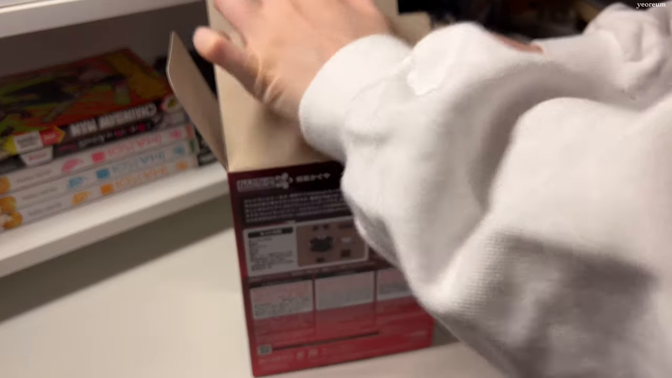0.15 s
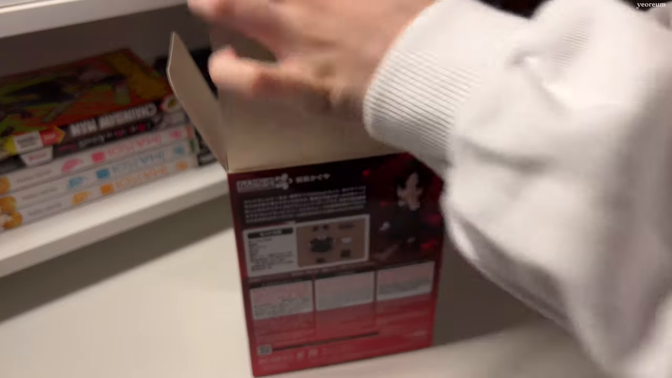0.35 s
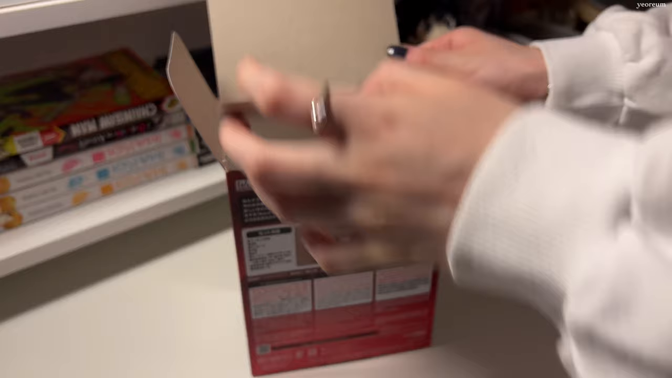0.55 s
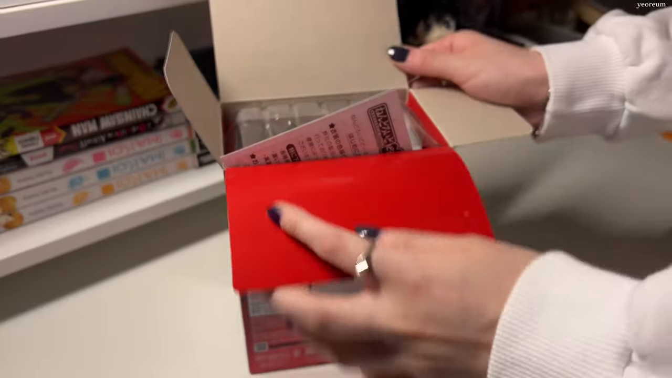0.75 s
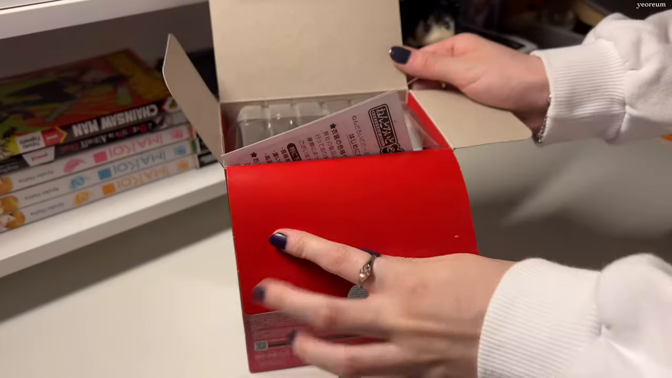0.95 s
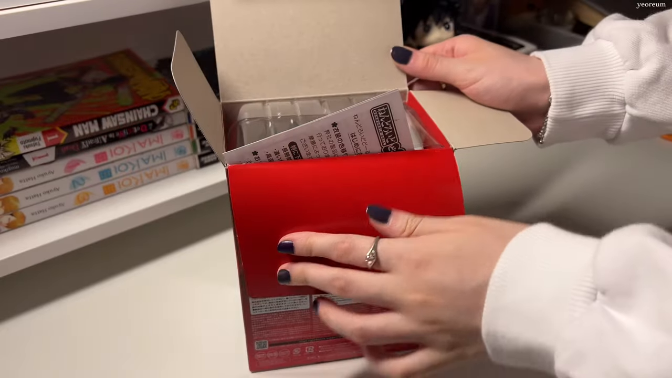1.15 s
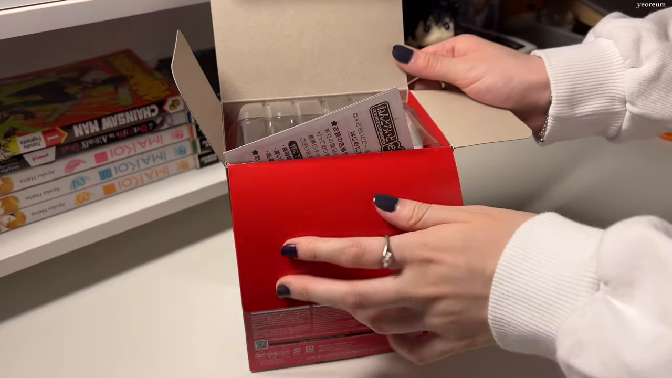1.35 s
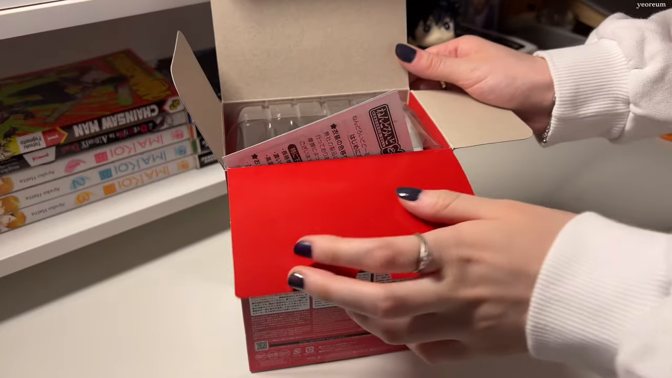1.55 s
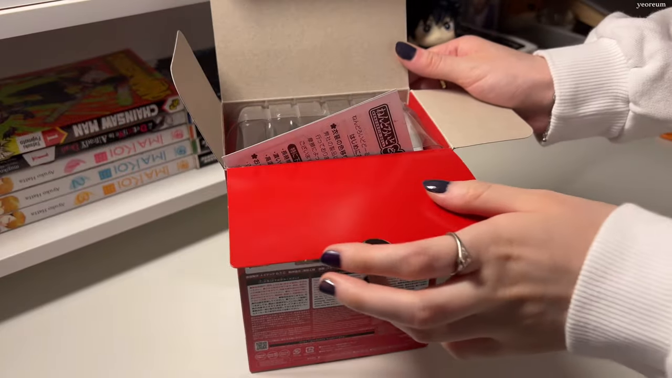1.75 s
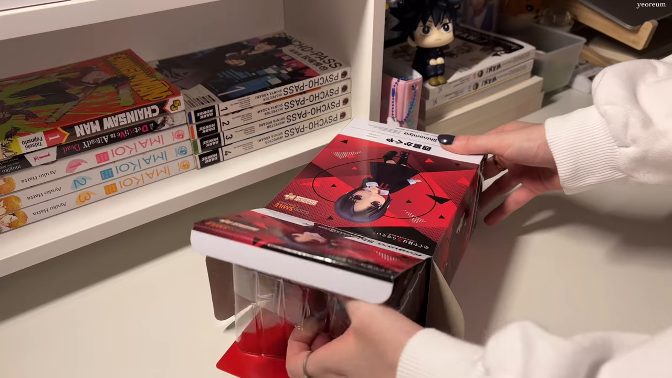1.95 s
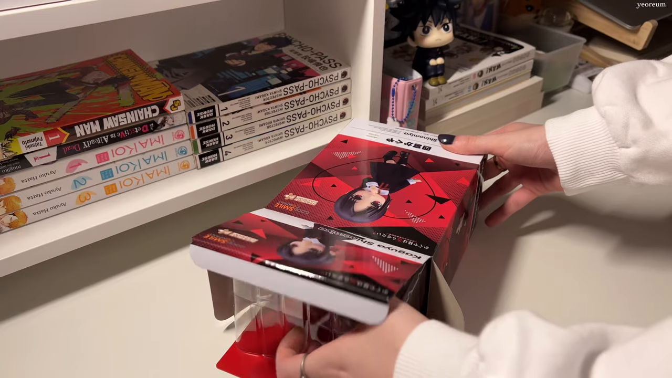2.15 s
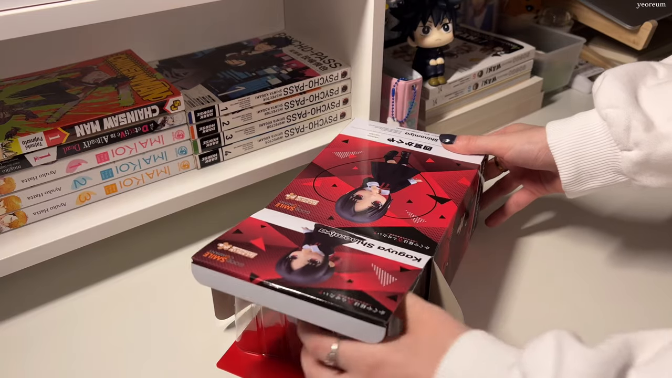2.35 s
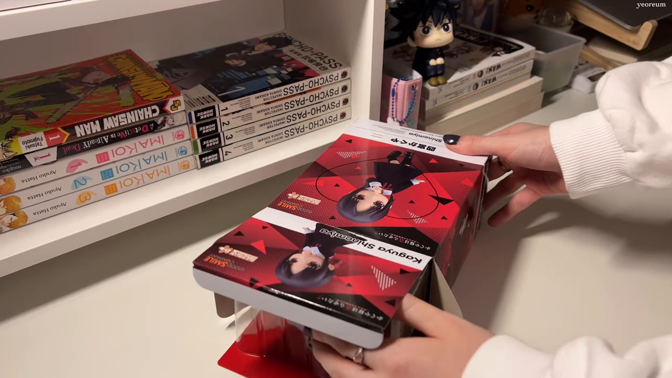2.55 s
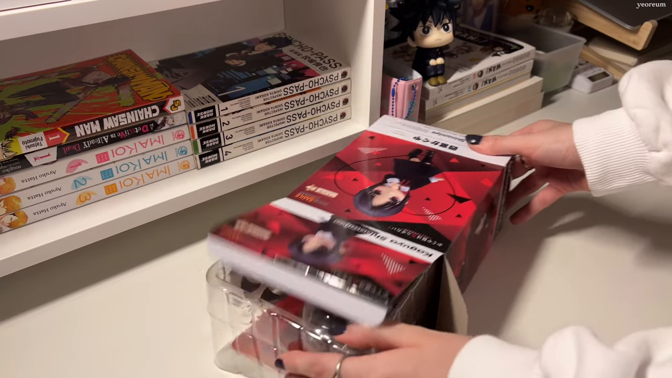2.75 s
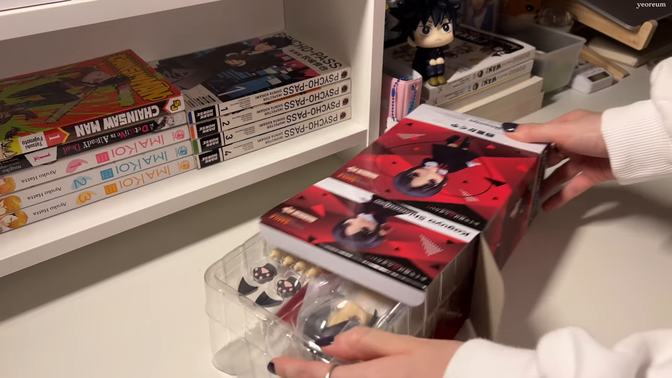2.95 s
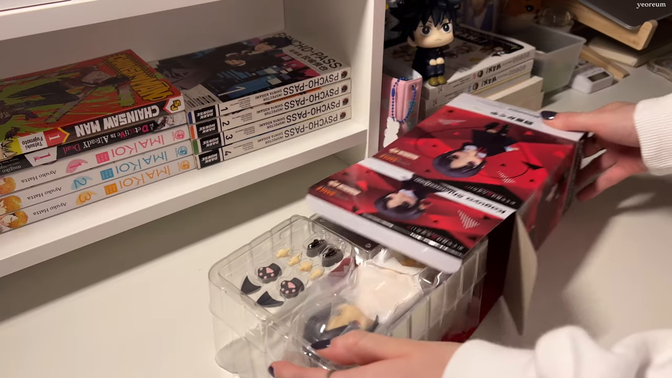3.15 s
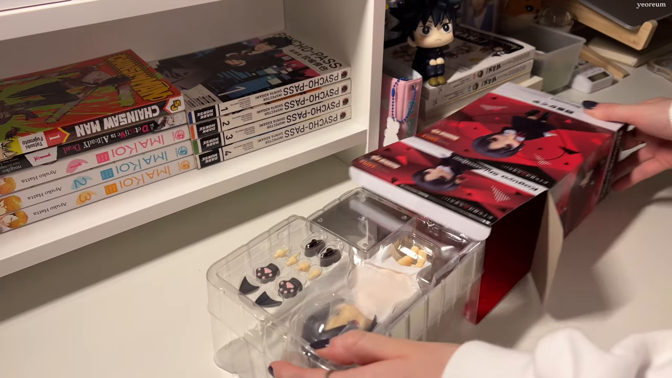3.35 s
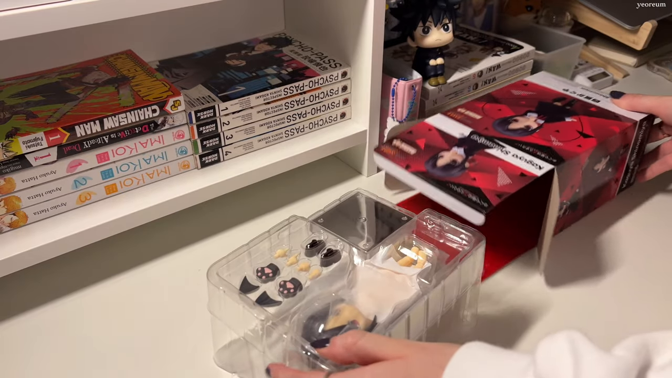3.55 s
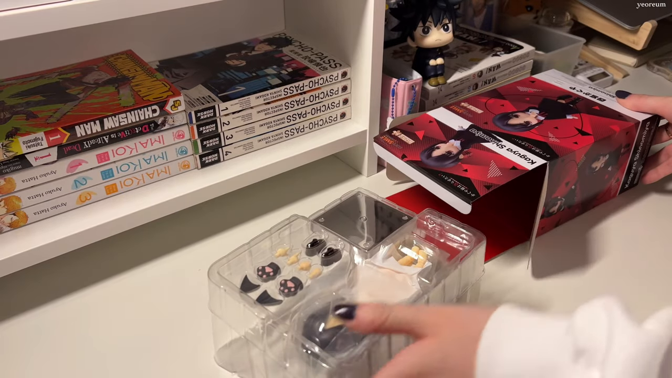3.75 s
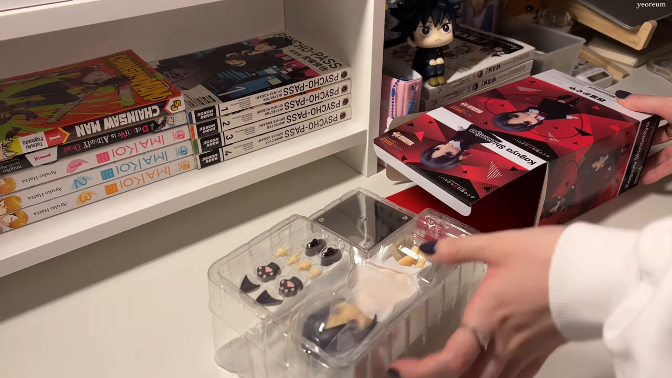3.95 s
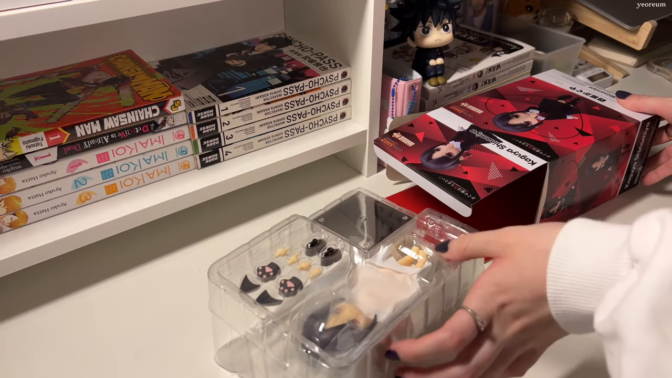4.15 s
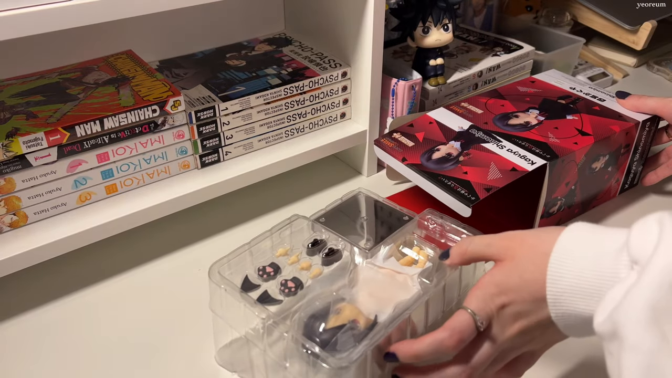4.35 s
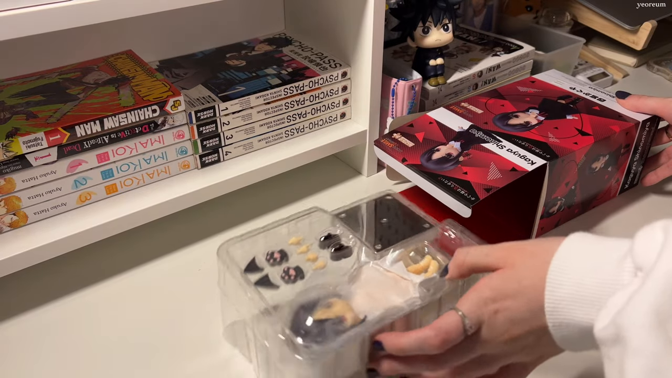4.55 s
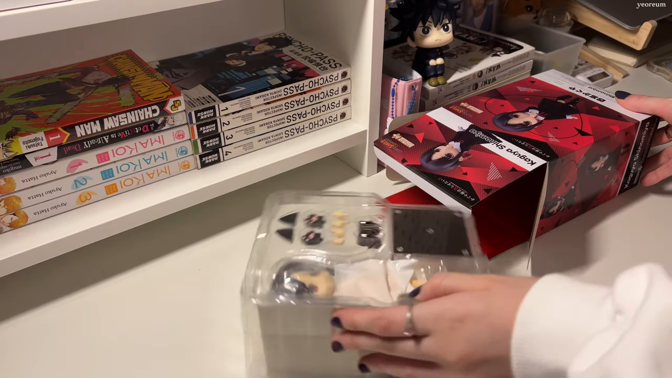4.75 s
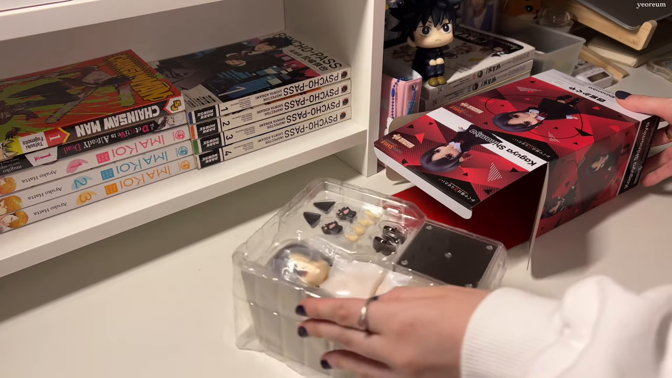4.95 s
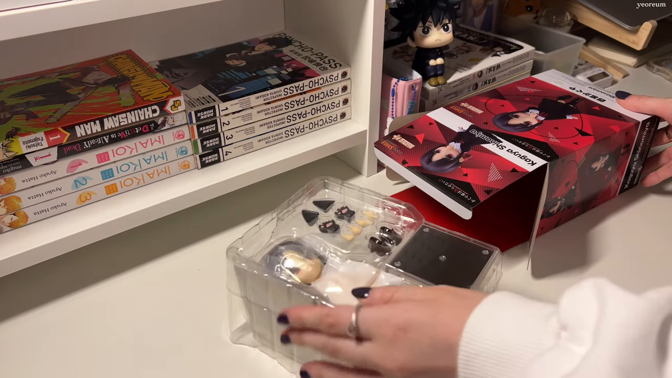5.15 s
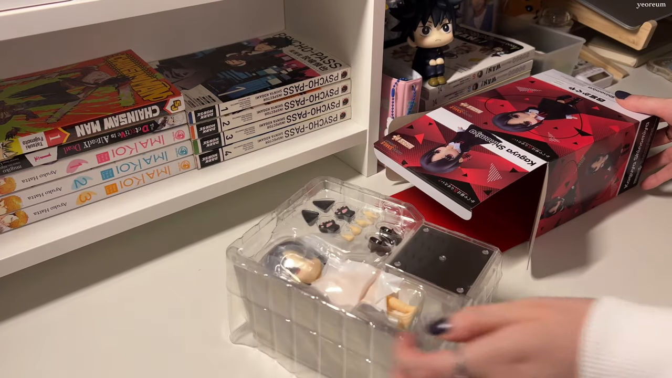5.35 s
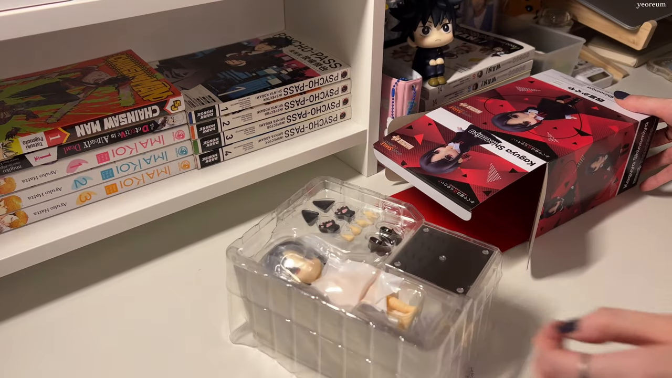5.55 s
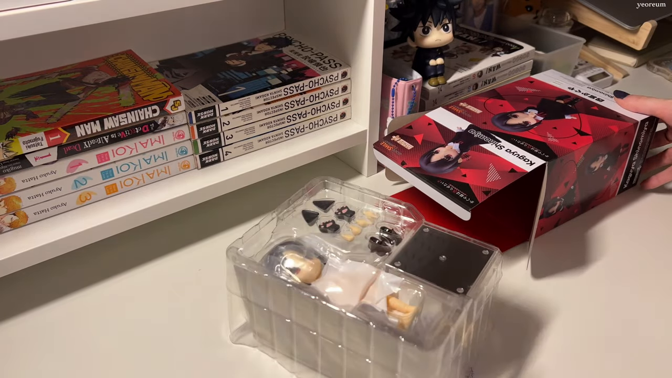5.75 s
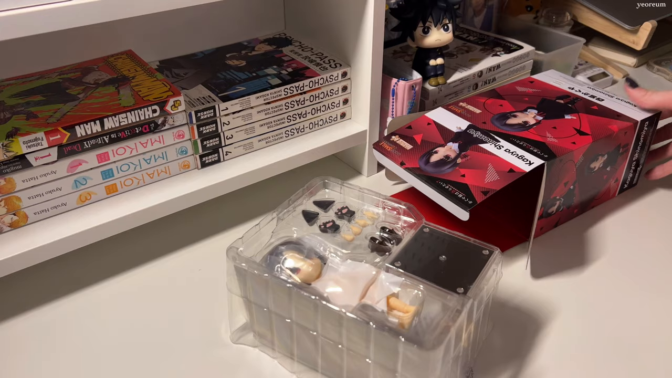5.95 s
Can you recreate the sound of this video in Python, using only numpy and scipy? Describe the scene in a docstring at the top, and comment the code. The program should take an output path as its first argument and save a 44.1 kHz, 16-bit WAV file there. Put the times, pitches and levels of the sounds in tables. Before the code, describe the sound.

Close stereo microphone in a small quiet room with a faint low hum. Fingers brush and tap a cardboard box, a flap scrapes free and lands with a dull knock. The box is tipped with sharper clacks, then a thin plastic tray is dragged out with a loud hollow scrape and crackle. Light taps follow, the tray is turned with a crinkly rub, and it goes quiet.

```python
"""A cardboard box ticks, knocks and scrapes as hands fold back its flaps and tip it over. A clear plastic tray
is pulled out of it and turned round on the desk, close by in a small quiet room with a low hum.
Blows ring damped modes and panel resonances; rubbing is stick-slip noise coloured by the panels. Pops are
falling notes, crackle is a shower of short rings, cloth is filtered noise; a short room tail follows."""
import sys
import numpy as np
from scipy import signal
from scipy.fft import rfft, irfft, next_fast_len
from scipy.io import wavfile
from scipy.ndimage import uniform_filter1d

SR = 44100
rng = np.random.default_rng(int(sys.argv[2]) if len(sys.argv) > 2 else 0)


def file_out(sig):
    """Save sig as 16-bit WAV at sys.argv[1]."""
    # one column per channel
    cols = np.atleast_2d(sig).T
    # limit, then scale
    lim = np.clip(cols, -1, 1)
    pcm = np.round(lim * 32767).astype(np.int16)
    wavfile.write(sys.argv[1], SR, pcm)


N = 264155
BLOW_SIZE, ATTACK_SIZE = 22050, 882  # samples: half a second and 20 ms
GRID_HZ = np.fft.rfftfreq(8192, 1 / SR)  # frequencies at which filters are drawn

# Resonances of the cardboard panels. Each row: frequency in Hz, width in Hz, lift in dB.
CARD_MODES = [(407, 50, 4), (565, 80, 4), (890, 110, 5), (1200, 130, 3), (1850, 380, 6), (3020, 430, 1)]
# Broad colour of a finger's rub, also used for cloth and dull dragging. Each row: frequency in Hz, level in dB.
FINGER_COLOUR = [(200, 8), (430, 6.5), (750, -6.5), (1400, -5.5), (2500, -13), (3500, -15), (5500, -30.5),
                 (8000, -32.5), (13000, -24.5), (16000, -30.5)]


def cardboard_box():
    """Impact and dry friction on card: fingers brush it, a flap scrapes free in a crescendo, the box is knocked."""
    # Blows. Each row: time in seconds, thud, clack and tick in dB, pitch of the struck spot in Hz, clack t60 in s.
    box_knocks = [(0.104, -49, -53, -67, 1660, 0.034), (0.161, -58, -53, -68, 1250, 0.049),
                  (0.181, -54, -55, -68, 510, 0.044), (0.481, -48, -51.5, -64, 490, 0.028),
                  (0.584, -62, -57, -66, 880, 0.052), (0.675, -55.5, -57, -54.5, 3430, 0.017),
                  (0.751, -65, -53, -53.5, 1970, 0.074), (0.837, -50.5, -50.5, -65, 790, 0.03),
                  (0.869, -59, -72, -83, 300, .03), (1.016, -25, -35.5, -44.5, 530, 0.02),
                  (1.033, -39, -37, -45, 910, 0.039), (1.089, -40, -41.5, -50, 1900, 0.028),
                  (1.117, -68, -51, -58, 2070, 0.041), (1.195, -48, -36, -46.5, 1880, 0.032),
                  (1.207, -41.5, -47.5, -65, 1920, 0.018), (1.218, -44, -67, -82, 300, .04),
                  (1.275, -70, -61.5, -90, 950, 0.034), (1.399, -81, -57, -74, 1350, 0.02),
                  (1.433, -56, -58, -68, 1320, 0.033), (1.462, -59, -64, -73, 1110, 0.024),
                  (1.488, -51.5, -58, -76, 1130, 0.038), (1.535, -69.5, -61.5, -74, 1130, 0.025),
                  (1.593, -54, -61, -81, 1140, 0.06), (1.839, -48, -56, -58, 1260, 0.06),
                  (1.876, -56.5, -57, -55, 1190, 0.046), (1.951, -64, -51.5, -57.5, 1190, 0.04),
                  (2.022, -50, -55, -72, 880, 0.039), (2.079, -54, -47, -61, 1920, 0.02),
                  (2.111, -41.5, -42.5, -49.5, 1240, 0.052), (2.143, -38, -29.5, -38, 1850, 0.034),
                  (2.186, -47, -42.5, -69, 1440, 0.057), (2.208, -54, -64, -84, 1800, 0.017),
                  (2.225, -68, -56.5, -76, 1480, 0.016), (2.253, -69.5, -50.5, -48, 1200, 0.012),
                  (2.326, -64, -46, -57, 1220, 0.083), (2.355, -61.5, -56, -66, 1540, 0.022),
                  (2.459, -50, -46, -56.5, 1270, 0.054), (2.484, -67, -47.5, -65.5, 428, .045),
                  (2.543, -56.5, -42.5, -61, 1220, 0.12), (2.713, -40, -32.5, -36.5, 1310, 0.03),
                  (2.718, -22.5, -24.5, -38.5, 630, 0.088), (2.741, -35.5, -35, -43, 2070, 0.03),
                  (2.831, -42, -25, -40.5, 1230, 0.03), (2.839, -38.5, -28.5, -62.5, 456, 0.085),
                  (2.888, -54, -29.5, -54, 630, 0.066), (2.921, -60, -44.5, -67, 1400, 0.013),
                  (3.08, -34, -27, -59, 685, 0.046)]
    # Strokes. Each row: start in seconds, length in seconds, scrape, hiss and drumming of the hollow body in dB.
    finger_rub = [(0.11, 0.29, -59.5, -66, -58), (0.48, 0.38, -53, -56, -65), (0.84, 0.38, -56.5, -69, -53),
                  (1.33, 0.15, -65, -64.5, -67), (1.84, 0.091, -56, -61, -49),
                  (1.96, 0.28, -55.5, -54.5, -67)]
    finger_scuffs = [(0.106, 0.018, -57, -65, -64), (0.14, 0.062, -55, -65, -68),
                     (0.212, 0.022, -48, -64, -49.5)]  # fingertips feel for the edge of the flap; columns as above
    flap_scrape = [(0.742, 0.031, -49, -50, -58), (0.772, 0.024, -50.5, -59, -60),
                   (0.794, 0.026, -40.5, -52.5, -65), (0.814, 0.0206, -36, -50.5, -54),
                   (0.834, 0.0082, -30.5, -60, -40)]  # the flap slips in jerks that grow harder; columns as above
    flap_smoothing = [(1.39, 0.39, -59.5, -59, -55.5)]  # fingers glide along the open flap; columns as above
    # Resonances of the flap. Each row: frequency in Hz, width in Hz, lift in dB.
    flap_modes = [(800, 120, 8), (1170, 100, 5), (1530, 220, 11), (1830, 220, 13.5), (2060, 90, 10),
                  (2240, 110, 12), (3330, 180, 6.5), (3600, 250, 5), (5300, 500, 6)]
    # Broad colour of the flap's scrape. Each row: frequency in Hz, level in dB.
    flap_colour = [(200, -9), (500, -10), (1200, -13.5), (2000, -12), (2800, -17), (5000, -24.5),
                   (8000, -23.5), (16000, -14.5)]

    knocks = blows(box_knocks, CARD_MODES, spot_db=11.5, spot_q=5, rise_s=0.0014,
                   tick_rise_s=0.0013, tick_t60=0.018)
    fingers = rub(strokes(finger_rub, attack_s=0.0073, swell_db_per_s=-22.5, release_t60=0.11, slow_db=-13.5),
                  FINGER_COLOUR, CARD_MODES, grain_db=4.5, grains_hz=685, judder_db=-2.5, judder_hz=93.9,
                  catch_per_s=49, catch_db=-15, bounce=0.43, bounce_s=0.00073)
    scuffs = rub(strokes(finger_scuffs, attack_s=0.012, swell_db_per_s=3, release_t60=0.038, slow_db=-1),
                 FINGER_COLOUR, CARD_MODES, grain_db=0.5, grains_hz=700, judder_db=2.0, judder_hz=164.4,
                 catch_per_s=110, catch_db=-10, bounce=0.24, bounce_s=0.00075)
    flap = rub(strokes(flap_scrape, attack_s=0.0029, swell_db_per_s=60, release_t60=0.018, slow_db=5),
               flap_colour, flap_modes, grain_db=-0.5, grains_hz=957, judder_db=0.5, judder_hz=264,
               catch_per_s=190, catch_db=-18, bounce=0.27, bounce_s=0.00054)
    glide = rub(strokes(flap_smoothing, attack_s=0.071, swell_db_per_s=-17.0, release_t60=0.18, slow_db=-3),
                FINGER_COLOUR, flap_modes, grain_db=0.0, grains_hz=820, judder_db=1.0, judder_hz=90.6,
                catch_per_s=17, catch_db=-14, bounce=0.16, bounce_s=0.00035)
    return panned(knocks, pan_db=0.8) + fingers + scuffs + glide + flap


def plastic_tray():
    """Stick-slip friction of a thin shell: the tray is gripped, tugged, drawn over the flap and turned round."""
    # Taps. Each row: time in seconds, thud, clack and tick in dB, pitch of the struck spot in Hz, clack t60 in s.
    tray_taps = [(3.379, -60, -53, -54, 1430, 0.012), (3.42, -42.5, -48, -56.5, 607, 0.034),
                 (3.554, -42.5, -36.5, -44.5, 1484, 0.078), (3.601, -57, -43, -70, 1310, 0.031),
                 (3.612, -64, -44.5, -59, 1420, 0.097), (3.657, -54, -47, -68, 1450, 0.052),
                 (4.075, -83.5, -43.5, -54, 1500, 0.032), (4.28, -63, -70, -96, 600, 0.062),
                 (4.386, -54.5, -46, -58.5, 1470, 0.022), (4.408, -48.5, -48.5, -62, 1430, 0.0072),
                 (4.453, -65, -68, -60, 1400, 0.063), (5.033, -54, -38.5, -61, 710, 0.062),
                 (5.069, -44.5, -46.5, -69, 720, 0.05), (5.1, -46, -56.5, -77, 680, 0.031),
                 (5.15, -61, -71, -93, 502, .08), (5.21, -59, -80, -93, 400, 0.053),
                 (5.713, -85, -67.5, -76.5, 1118, 0.042), (5.872, -65, -63, -90, 480, 0.03),
                 (5.918, -55, -56, -71.5, 1400, 0.049)]
    # Strokes. Each row: start in seconds, length in seconds, scrape, hiss and drumming of the hollow body in dB.
    tray_grip = [(2.1, 0.028, -43.5, -53, -49), (2.32, 0.43, -57, -64.5, -54.5),
                 (2.46, 0.27, -54, -56.5, -56)]
    tray_tug = [(2.54, 0.18, -32.5, -32, -40.5)]  # still tight in the box; columns as above
    tray_pull = [(2.68, 0.45, -31, -40, -34)]  # it rides out over the flap; columns as above
    tray_slide = [(2.95, 0.35, -34.5, -38.5, -44), (3.265, 0.14, -38.5, -41, -47),
                  (3.36, 0.28, -55, -51, -49.5)]  # it runs on along the desk, with one hitch; columns as above
    tray_turn = [(4.37, 0.6, -39.5, -37.5, -51.5)]  # columns as above
    tray_drag = [(4.35, 0.14, -48, -63, -57.5), (4.97, 0.11, -46, -64.5, -58)]  # slow and dull, as the turn starts and ends; columns as above
    # Tray resonances as it is held differently. Each row: frequency in Hz, width in Hz, lift in dB.
    tray_modes = [(240, 50, 4), (430, 30, 2.5), (545, 50, 7), (618, 75, 12.5), (715, 60, 10.5),
                  (850, 40, 2), (1170, 70, 5.5), (1410, 150, 8.5), (2850, 400, 3.5), (3830, 133, 2)]
    in_box_modes = [(445, 28, 4), (678, 80, 8), (926, 40, 4), (1230, 130, 5), (2180, 50, 4), (2610, 90, 6),
                    (2810, 100, 7), (4260, 190, 3), (5070, 90, 3)]  # columns as above
    on_flap_modes = [(180, 40, 6), (236, 30, 7), (345, 45, 7), (446, 30, 12), (614, 70, 11), (735, 60, 9),
                     (1200, 220, 6.5), (2034, 50, 7), (2810, 200, 4)]  # columns as above
    on_desk_modes = [(440, 30, 7), (560, 50, 6), (655, 100, 9), (1160, 55, 9), (1470, 80, 8),
                     (1750, 170, 3), (2440, 66, 5), (3100, 45, 2), (3790, 200, 9), (4340, 60, 5),
                     (5750, 140, 3)]  # running along the desk; columns as above
    # Broad colours of pulling and turning. Each row: frequency in Hz, level in dB.
    pull_colour = [(200, 2.5), (600, 3.5), (1000, 3), (2500, 0), (4000, -9), (7000, -20), (9000, -18),
                   (13000, -15.5), (16000, -21)]
    turn_colour = [(200, -5), (380, 6.5), (600, 7), (950, 5), (2500, 3.5), (4000, -7), (7000, -18),
                   (13000, -12), (16000, -17)]  # columns as above
    # The slide's emphasis rises, then sinks. Each row: time in seconds, centre frequency in Hz.
    slide_focus = [(2.98, 2500), (3.02, 2500), (3.06, 3850), (3.21, 3750), (3.28, 2300), (3.38, 1500)]
    # The part of the tray that speaks most shifts as it turns. Each row: time in seconds, centre frequency in Hz.
    turn_focus = [(4.38, 1410), (4.5, 1230), (4.57, 720), (4.63, 1350), (4.76, 1440), (4.82, 684),
                  (4.88, 1390), (4.96, 646), (5.04, 715)]

    taps = blows(tray_taps, tray_modes, spot_db=15.0, spot_q=4.3, rise_s=0.002,
                 tick_rise_s=0.0016, tick_t60=0.031)
    grip = rub(strokes(tray_grip, attack_s=0.021, swell_db_per_s=-0.5, release_t60=0.59, slow_db=-9.0),
               pull_colour, CARD_MODES, grain_db=1.5, grains_hz=560, judder_db=-3.0, judder_hz=106.6,
               catch_per_s=84, catch_db=0.5, bounce=0.12, bounce_s=0.0014)
    tugging = strokes(tray_tug, attack_s=0.091, swell_db_per_s=-8.0, release_t60=0.16, slow_db=1.0)
    tug = rub(tugging, pull_colour, in_box_modes, grain_db=0.0, grains_hz=1244, judder_db=-1.0,
              judder_hz=138.5, catch_per_s=38, catch_db=-13.0, bounce=0.21, bounce_s=0.00142)
    pulling = strokes(tray_pull, attack_s=0.064, swell_db_per_s=-24.5, release_t60=0.18, slow_db=-4.0)
    pull = rub(pulling, pull_colour, on_flap_modes, grain_db=1.5, grains_hz=881, judder_db=-0.5,
               judder_hz=129.8, catch_per_s=57, catch_db=-14, bounce=0.13, bounce_s=0.0016)
    sliding = strokes(tray_slide, attack_s=0.069, swell_db_per_s=-13, release_t60=0.19, slow_db=-3.0)
    slide = rub(sliding, pull_colour, on_desk_modes, grain_db=2.5, grains_hz=900, judder_db=1.7,
                judder_hz=150, catch_per_s=110, catch_db=-13, bounce=0.4, bounce_s=0.0015)
    slide = shifting(slide, slide_focus, lift_db=2.0, octaves=0.16)
    turning = strokes(tray_turn, attack_s=0.13, swell_db_per_s=1.0, release_t60=0.4, slow_db=-12.5)
    turn = rub(turning, turn_colour, tray_modes, grain_db=1.5, grains_hz=899, judder_db=0.66,
               judder_hz=151.6, catch_per_s=130, catch_db=-16, bounce=0.14, bounce_s=0.00124)
    turn = shifting(turn, turn_focus, lift_db=2.0, octaves=0.33)
    drag = rub(strokes(tray_drag, attack_s=0.019, swell_db_per_s=3, release_t60=0.13, slow_db=-12),
               FINGER_COLOUR, tray_modes, grain_db=1.0, grains_hz=960, judder_db=-3.5, judder_hz=118.7,
               catch_per_s=90, catch_db=-19, bounce=0.17, bounce_s=0.00121)
    snaps = crackle(tugging[0] + pulling[0] + sliding[0], on_desk_modes,
                    per_s=220, spread_db=4.5, t60=0.005, gain_db=-6.5)
    snaps += crackle(turning[0], tray_modes, per_s=300, spread_db=2.5, t60=0.009, gain_db=-10.5)
    return panned(taps, pan_db=1.5) + grip + tug + pull + slide + turn + drag + snaps


def blows(rows, panel, spot_db, spot_q, rise_s, tick_rise_s, tick_t60):
    """Impact excitation: a contact tick, a brief chatter in the panels and a modal thud of the hollow body."""
    # Modes of the hollow box on the desk. Each row: nominal frequency in Hz, level in dB, t60 in seconds.
    thud_modes = [(75, -13.5, 0.67), (106.4, -2.5, 0.31), (137.3, 4.5, 0.049), (166.8, 9, 0.04),
                  (215.2, -0.5, 0.11), (261.3, -2.5, 0.12), (340, -2.5, 0.14), (436.3, -3, 0.098),
                  (570, -1, 0.05)]
    # Broad colour of the panel chatter. Each row: frequency in Hz, level in dB.
    clack_colour = [(100, -17.5), (210, 0.5), (300, 3), (600, 1), (1500, -4), (3000, -4), (5000, -19),
                    (9000, -41), (16000, -55.5)]
    # Colour of the contact tick. Each row: frequency in Hz, level in dB.
    tick_colour = [(1000, -27), (3000, 3.5), (4500, -1.5), (8000, -6), (13000, -1), (16000, -6),
                   (20000, -20.5)]
    out, t = np.zeros((2, N)), np.arange(BLOW_SIZE) / SR
    contact_db = body(tick_colour)
    # card and thin plastic give way, so the contact builds up over a millisecond or two
    rise, tick_rise = 1 - np.exp(-(t / rise_s) ** 2), 1 - np.exp(-(t / tick_rise_s) ** 2)
    for s, thud_db, clack_db, tick_db, spot_hz, t60 in rows:
        detune = 1 + 0.027 * rng.standard_normal(len(thud_modes))
        ring = np.zeros(BLOW_SIZE)
        for k, (hz, db, life) in enumerate(thud_modes):
            ring += (-1) ** k * amp(db) * decay(t, life) * np.sin(2 * np.pi * hz * detune[k] * t)
        # the loose contents shift, so the thud dies away unevenly
        shifts, uneven_db, shifts_per_s = rng.standard_normal(64), 2.5, 55
        ring = ring * amp(uneven_db * np.interp(t * shifts_per_s, np.arange(len(shifts)), shifts))

        spot = [(spot_hz, spot_hz / spot_q, spot_db)]
        panel_db = np.maximum(body(clack_colour, panel), body(clack_colour, spot))
        # a soft contact that sounds low also excites the higher panel modes less
        reach, dull_db = 1.8, -5
        panel_db = panel_db + dull_db * np.tanh(2 * np.log(np.maximum(GRID_HZ / (reach * spot_hz), 1)))
        chatter = filtered(noise_pair(BLOW_SIZE) * rise * decay(t, max(t60, 0.005)), panel_db)
        contact = filtered(noise_pair(BLOW_SIZE) * tick_rise * decay(t, tick_t60), contact_db)
        clack, tick = amp(clack_db) * struck(chatter), amp(tick_db) * struck(contact)
        thud = amp(thud_db) * struck(np.array([ring, ring]) * rise)
        add(out, s - rise_s, thud + clack + tick)
        # the surfaces graze each other just before they meet
        graze_db, graze_s = -15, 0.004
        add(out, s - rise_s - graze_s, amp(graze_db) * (tick + clack))
    return out


def strokes(rows, attack_s, swell_db_per_s, release_t60, slow_db):
    """Friction follows pressure, which builds, drifts and lets go; slow_db weights the hiss where speed is low."""
    drum_power = 0.67  # the hollow body follows the pressure less steeply than the scrape does
    hiss_lag, hiss_stop = 3.2, 0.25  # exponents that make the hiss rise later and change how it is released
    power = np.zeros((3, N))
    for start, length, scrape_db, hiss_db, drum_db in rows:
        age = np.arange(N) / SR - start
        moving, after = np.clip(age, 0, length), np.maximum(age - length, 0)
        rise = np.clip(age / attack_s, 0, 1)
        speed = np.sin(np.pi * moving / length)
        release = decay(after, release_t60)
        pressure = rise ** 1.3 * amp(swell_db_per_s * moving) * release
        scrape = amp(scrape_db) * pressure
        hiss = amp(hiss_db + slow_db * (1 - speed)) * pressure * rise ** hiss_lag * release ** hiss_stop
        drum = amp(drum_db) * pressure ** drum_power
        power += np.array([scrape, hiss, drum]) ** 2
    return np.sqrt(power)


def rub(levels, colour, resonances, grain_db, grains_hz, judder_db, judder_hz,
        catch_per_s, catch_db, bounce, bounce_s):
    """Stick and slip: fine grains, clumped by a slower judder, excite the panels and the hollow body."""
    # Colour of the hollow body's drumming. Each row: frequency in Hz, level in dB.
    drum_colour = [(20, -26), (35, -15.5), (50, -12), (72, -2.5), (90, -5.5), (106, 3.5), (135, -2),
                   (185, -1.5), (280, -5), (500, -22.5), (1500, -84.5)]
    t = np.arange(N) / SR
    scrape, hiss, drum = levels
    force = amp(judder_db * wander(judder_hz)) * catches(catch_per_s, catch_db, 0.002)
    slips = noise_pair(N) * amp(grain_db * wander(grains_hz)) * force
    # as the pressure shifts, different patches of the panel speak
    spectrum = signal.stft(slips, nperseg=512)[2]
    patches = uniform_filter1d(rng.standard_normal(spectrum.shape[1:]), size=3, axis=0)
    patches = evened(uniform_filter1d(patches, size=14, axis=1))
    patchy_db = 2.0
    slips = signal.istft(spectrum * amp(patchy_db * patches), nperseg=512)[1][:, :N]
    # the contact moves, so its bounce off the nearest panel sweeps the colour
    delay_s = bounce_s * amp(2.67 * wander(5))
    bounced = np.array([np.interp(t - delay_s, t, channel) for channel in slips])
    swept = slips + bounce * bounced
    # the scrape keeps the middle band, the hiss the treble
    response_db = body(colour, resonances)
    treble = (GRID_HZ / 4600) ** 6 + 1e-9
    bass = (260 / (GRID_HZ + 20)) ** 4
    scrape_db = response_db - 10 * np.log10((1 + treble) * (1 + bass))
    hiss_db = response_db - 10 * np.log10(1 + 1 / treble)
    out = scrape * evened(filtered(swept, scrape_db))
    # fast sliding breaks the contact into finer, brighter grains
    fine = noise_pair(N) * amp(grain_db * wander(grains_hz)) * np.sqrt(force)
    out += hiss * evened(filtered(fine, hiss_db))
    return out + drum * evened(filtered(slips, body(drum_colour)))


def catches(per_s, size_db, length_s):
    """Stored strain released at random: an edge catches and lets go in brief bursts of force, a few large."""
    chance, size = rng.random(N), np.minimum(rng.exponential(1, N), 3)
    kicks = (chance < per_s / SR) * size * amp(size_db)
    return 1 + signal.lfilter([1], [1, -np.exp(-1 / (length_s * SR))], kicks)


def shifting(x, focus, lift_db, octaves):
    """Time-varying resonance: a broad peak moves along the curve focus."""
    hz, t, spectrum = signal.stft(x, SR, nperseg=512)
    away = np.log2((hz[:, None] + 1) / np.interp(t, *np.transpose(focus))) / octaves
    return signal.istft(spectrum * amp(lift_db * np.exp(-away ** 2)), SR, nperseg=512)[1][:, :N]


def crackle(level, resonances, per_s, spread_db, t60, gain_db):
    """Snap release: ridges of thin plastic snag and spring free, each ringing near one resonance for a moment."""
    t = np.arange(4 * ATTACK_SIZE) / SR
    snaps = (rng.random(N) < per_s / SR) * amp(spread_db * np.minimum(rng.exponential(1, N), 3))
    which, out = rng.integers(0, len(resonances), N), np.zeros((2, N))
    for at in np.flatnonzero(snaps * (level > level.max() / 100)):
        hz = resonances[which[at]][0] * np.exp(0.1 * rng.standard_normal())
        snap = snaps[at] * np.sin(2 * np.pi * hz * t) * decay(t, t60)
        add(out, at / SR, panned(snap, 3 * rng.standard_normal()))
    return amp(gain_db) * level * out


def pops():
    """Buckling: a flexed panel pops with a ragged note that falls as it relaxes, broken up by rattling."""
    # Each row: time in seconds, level in dB, nominal first and last frequency in Hz, t60 in seconds.
    panel_pops = [(0.4805, -46.5, 1650, 420, .035), (2.8305, -26, 1500, 330, .05),
                  (3.083, -28, 700, 500, .06), (5.036, -59, 2900, 2850, .03),
                  (5.1, -56.5, 2870, 2780, .025)]
    out, t = np.zeros((2, N)), np.arange(BLOW_SIZE) / SR
    relax_s, rise_s, ragged, rattle_db, rattle_hz = 0.007, 0.0006, 0.35, 4, 800
    for s, db, first_hz, last_hz, t60 in panel_pops:
        buckle, rattle = wander(rattle_hz)[:BLOW_SIZE], wander(rattle_hz)[:BLOW_SIZE]
        hz = last_hz + (first_hz - last_hz) * np.exp(-t / relax_s) * (1 + ragged * buckle)
        note = np.sin(2 * np.pi * np.cumsum(hz) / SR) * (1 - np.exp(-t / rise_s)) * decay(t, t60)
        note = note * amp(rattle_db * np.tanh(rattle))  # the panel rattles against its neighbours
        add(out, s, amp(db) * struck(np.array([note, note])))
    return out


def sleeve():
    """Cloth friction: broadband grains swish, swelling and fading as the arm draws back."""
    # Each row: start in seconds, length in seconds, scrape, hiss and drumming of the hollow body in dB.
    sleeve_brush = [(0.27, 0.26, -55, -52.5, -60.5), (5.59, 0.218, -70.5, -73.5, -79)]
    return rub(strokes(sleeve_brush, attack_s=0.031, swell_db_per_s=-11, release_t60=0.048, slow_db=-9.5),
               FINGER_COLOUR, [(1430, 500, 7.2)], grain_db=2.5, grains_hz=650, judder_db=-4.5,
               judder_hz=59.6, catch_per_s=51, catch_db=-10, bounce=0.3, bounce_s=0.00084)


def cuff_zip():
    """Periodic ribs flick past an edge: a fluttering narrow noise band whose pitch follows the slowing speed."""
    # A ribbed cuff on the edge of the card. Each row: time in seconds, centre frequency in Hz, level in dB.
    zip_curve = [(0.31, 6600, -85), (0.335, 6300, -64), (0.36, 6200, -70), (0.395, 5750, -62),
                 (0.425, 5550, -62.5), (0.455, 5400, -71), (0.48, 5300, -90)]
    when, hz, db = np.transpose(zip_curve)
    t, width_hz = np.arange(N) / SR, 420
    lowpass = signal.butter(2, width_hz / 2, fs=SR, output="sos")
    fuzz = signal.sosfilt(lowpass, rng.standard_normal((2, 2, N)))
    carrier = np.exp(2j * np.pi * np.cumsum(np.interp(t, when, hz)) / SR)
    ribs = ((fuzz[0] + 1j * fuzz[1]) * carrier).real
    return evened(ribs) * amp(np.interp(t, when, db)) * (t > when[0]) * (t < when[-1])


def shelves(x, decay_s, count=4):
    """Early scattering: books and shelves return sparse echoes whose pattern changes as hands and box move."""
    t, out = np.arange(4 * ATTACK_SIZE) / SR, np.zeros((2, N))
    shifts_per_s = 9
    shares = np.array([wander(shifts_per_s) for _ in range(count)])
    for share in shares / np.sqrt(np.sum(shares ** 2, axis=0) + 1e-9):
        taps = noise_pair(len(t)) * (rng.random(len(t)) < 0.06) * (t > 0.0012) * np.exp(-t / decay_s)
        taps = filtered(taps, read([(200, -12.0), (1500, 5.5)], GRID_HZ))  # mostly treble is scattered
        out += signal.oaconvolve(x * share, taps / np.linalg.norm(taps[0]), axes=1)[:, :N]
    return out


def room(x, early_db, early_s, tail_db):
    """Reverberation: direct sound, early scatter, and a noise tail decaying at its own rate in each band."""
    # Each row: frequency in Hz, reverberation time t60 in seconds.
    room_t60 = [(100, 0.91), (400, 0.57), (2000, 0.17), (6000, 0.41), (16000, 0.415)]
    t = np.arange(BLOW_SIZE) / SR
    hz, age, spectrum = signal.stft(noise_pair(BLOW_SIZE) * (t > 0.008), SR, nperseg=256)
    spectrum = spectrum * decay(age, read(room_t60, hz)[:, None])
    tail = signal.istft(spectrum, SR, nperseg=256)[1][:, :BLOW_SIZE]
    tail = signal.fftconvolve(x, tail / np.linalg.norm(tail[0]), axes=1)[:, :N]
    return x + amp(early_db) * shelves(x, early_s) + amp(tail_db) * tail


def room_tone():
    """Stationary background: filtered air noise, a low hum and a thin whine whose level wavers slightly."""
    # Colour of the still room. Each row: frequency in Hz, level in dB before the noise is scaled.
    air_colour = [(20, -26), (45, 2), (105, 1), (200, -7), (350, -15.5), (510, -14), (750, -24.5),
                  (1100, -33.5), (1400, -25), (2200, -28.5), (3700, -22), (4500, -36.5), (8500, -44),
                  (14000, -36), (16000, -58)]
    # Hum and whine. Each row: frequency in Hz, mean level in dB.
    hum_tones = [(120, -62.5), (3720, -85.5), (4021, -92.5)]
    t, air_db = np.arange(N) / SR, -61.5
    tones = np.zeros(N)
    for hz, db in hum_tones:
        tones += amp(db) * np.sqrt(2) * np.sin(2 * np.pi * (hz * t + rng.random()))
    air = amp(air_db) * evened(filtered(noise_pair(N), body(air_colour)))
    return air + tones * amp(0.54 * wander(4.5))


def amp(db):
    """Decibels to gain: twenty decibels are a factor of ten in amplitude."""
    return 10 ** (np.asarray(db) / 20)


def decay(t, t60):
    """Exponential damping: the amplitude falls by 60 dB in t60 seconds."""
    return np.exp(-np.log(1000) * t / t60)


def evened(x):
    """Power normalisation: scales to an rms of one."""
    return x / np.sqrt(np.mean(x ** 2) + 1e-20)


def struck(x):
    """Energy normalisation: a blow gets the energy of 20 ms at unit level."""
    return x / np.sqrt(np.sum(x ** 2) / (2 * ATTACK_SIZE) + 1e-20)


def read(points, hz):
    """Interpolation of a table on a logarithmic frequency axis."""
    f, value = np.transpose(points)
    return np.interp(np.log(hz + 1), np.log(f + 1), value)


def add(mix, s, sound):
    """Superposition: mixes a stereo sound in at time s."""
    part = mix[:, max(round(s * SR), 0):][:, :sound.shape[1]]
    part += sound[:, :part.shape[1]]


def panned(x, pan_db):
    """Level difference between the ears: leans a sound to the left by pan_db."""
    return x * amp([[pan_db / 2], [-pan_db / 2]])


def body(colour, resonances=()):
    """Resonance: response in dB of a broad colour with resonant peaks on it."""
    peaks = sum(db / (1 + (2 * (GRID_HZ - hz) / width) ** 2) for hz, width, db in resonances)
    return read(colour, GRID_HZ) + peaks


def filtered(x, response_db):
    """Causal minimum-phase filter: resonances ring after a click, never before it."""
    log_gain = np.log(amp(np.concatenate([response_db, response_db[-2:0:-1]])))
    response = np.exp(np.conj(signal.hilbert(log_gain)))[:len(GRID_HZ)]
    taps = irfft(response)[:len(GRID_HZ)]
    return signal.oaconvolve(x, taps[None], axes=1)[:, :x.shape[1]]


def noise_pair(size):
    """Interchannel coherence: white noise at two microphones with a correlation set by frequency."""
    # Each row: frequency in Hz, left-right correlation.
    likeness = [(60, .99), (150, .94), (230, .8), (330, .62), (500, .88), (800, .8), (1400, .76),
                (3100, .58), (5000, .48), (8000, .8), (16000, .82)]
    padded = next_fast_len(size, True)
    a, b = rfft(rng.standard_normal((2, padded)))
    same = np.clip(read(likeness, np.fft.rfftfreq(padded, 1 / SR)), -1, 1)
    mid, side = a * np.sqrt((1 + same) / 2), b * np.sqrt((1 - same) / 2)
    return irfft(np.array([mid + side, mid - side]), padded)[:, :size]


def wander(rate_hz):
    """Random modulation: a curve of unit rms with rate_hz new values a second, joined by straight lines."""
    knots = rng.standard_normal(N // 8)
    return evened(np.interp(np.arange(N) * rate_hz / SR, np.arange(len(knots)), knots))


def scene():
    """Superposition of box and tray, handled on the desk, in the room and over its background."""
    handling = cardboard_box() + plastic_tray() + pops() + sleeve() + cuff_zip()
    return room(handling, early_db=-8.5, early_s=0.0043, tail_db=-12.0) + room_tone()


def record(dry):
    """Two microphone ports as linear filters: level and phase differ by frequency, and the band is limited."""
    # Level difference of the ports. Each row: frequency in Hz, left over right in dB.
    port_lean = [(60, .8), (140, 3.5), (210, 2.5), (330, -1.2), (500, -1.5), (750, 3), (1200, 1.3),
                 (1800, .8), (2700, 2.2), (4400, 6.5), (8000, .8), (15000, -.3)]
    # Microphone response with a narrow treble dip. Each row: frequency in Hz, level in dB.
    port_dip = [(5600, -2.5), (7200, -0.5), (8600, 2.5), (9250, -4), (9800, -27), (10300, -29.5),
                (10850, -6), (11500, -8.5)]
    # Phase difference of the ports. Each row: frequency in Hz, lead of the left in radians.
    port_phase = [(100, 0), (300, .4), (750, .75), (1030, 0), (1550, .5), (2100, .3), (3400, 1.5),
                  (4300, .9), (5000, .9), (6700, .3), (8000, -2), (10900, -3.7), (12600, -6), (16000, -7.4)]
    lean_db, dip_db = body(port_lean) / 2, body(port_dip)
    left, right = filtered(dry[:1], dip_db + lean_db), filtered(dry[1:], dip_db - lean_db)
    size = next_fast_len(N + BLOW_SIZE, True)
    lag = np.exp(-1j * read(port_phase, np.fft.rfftfreq(size, 1 / SR)))
    right = irfft(rfft(right, size) * lag, size)[:, :N]
    low_cut_hz, edge_hz = 36, 15950
    low_cut = signal.butter(4, low_cut_hz, "high", fs=SR, output="sos")
    ports = signal.sosfilt(low_cut, np.vstack([left, right]))
    edge = signal.firwin(511, edge_hz, window=("kaiser", 9), fs=SR)
    return signal.oaconvolve(ports, edge[None], "same")


dry = scene()
out = record(dry)
file_out(out)
```